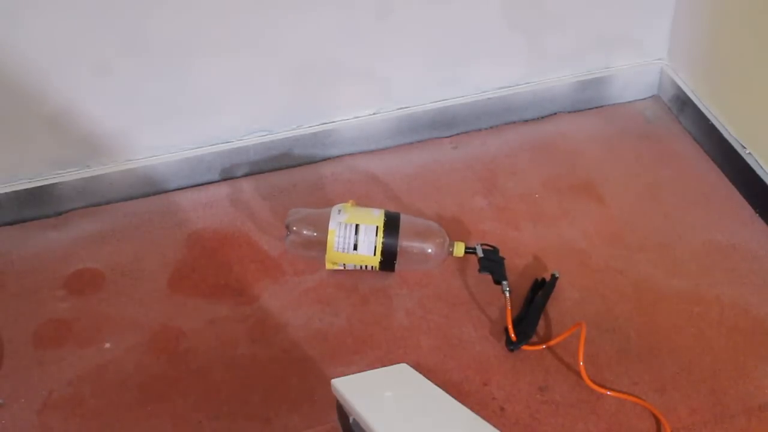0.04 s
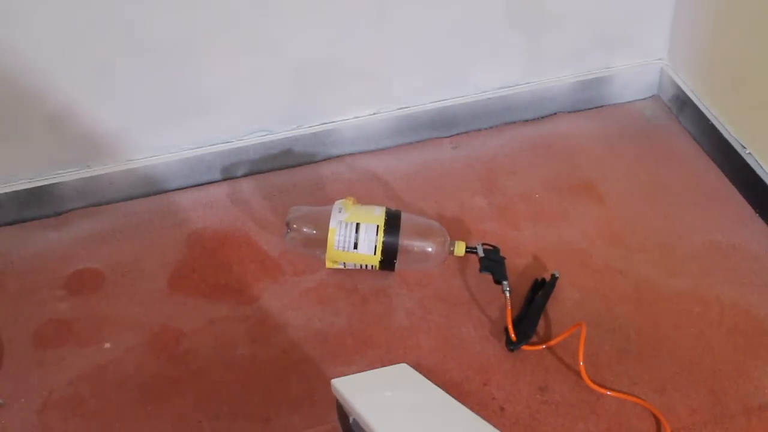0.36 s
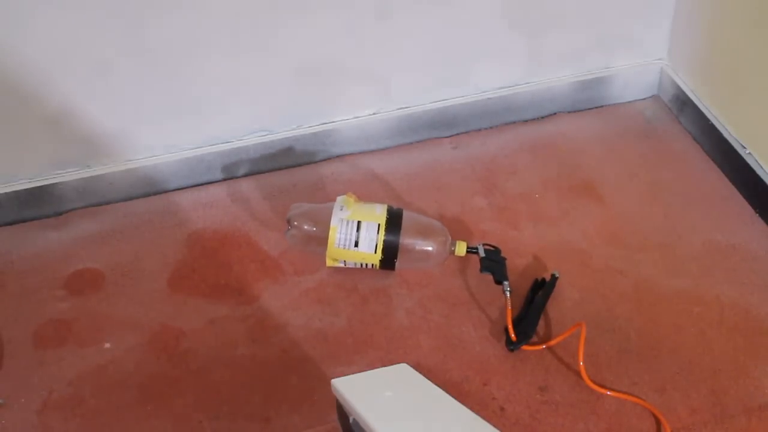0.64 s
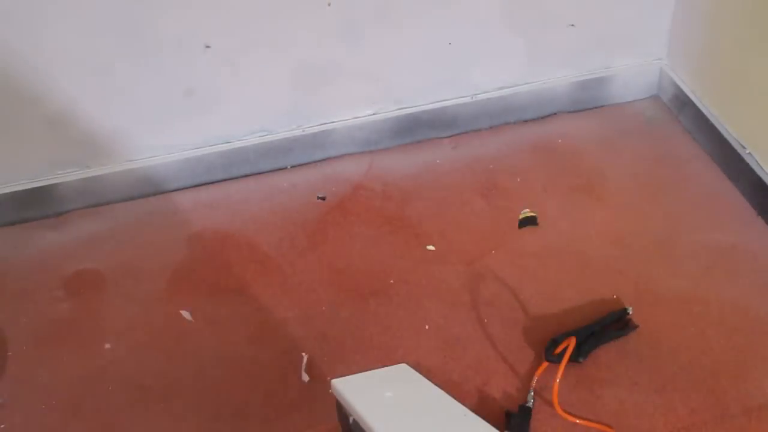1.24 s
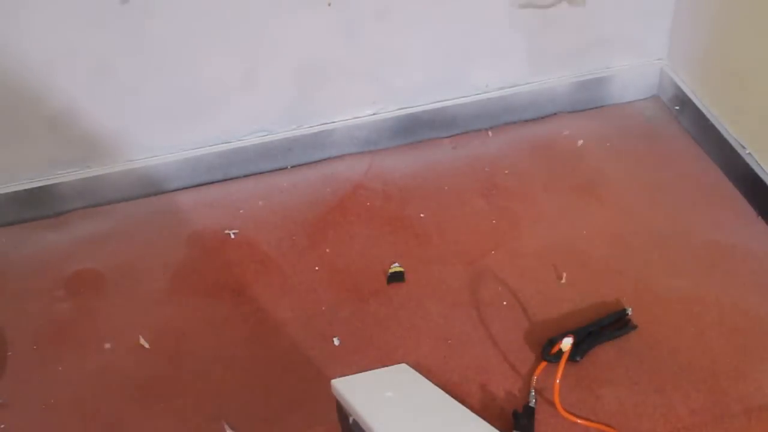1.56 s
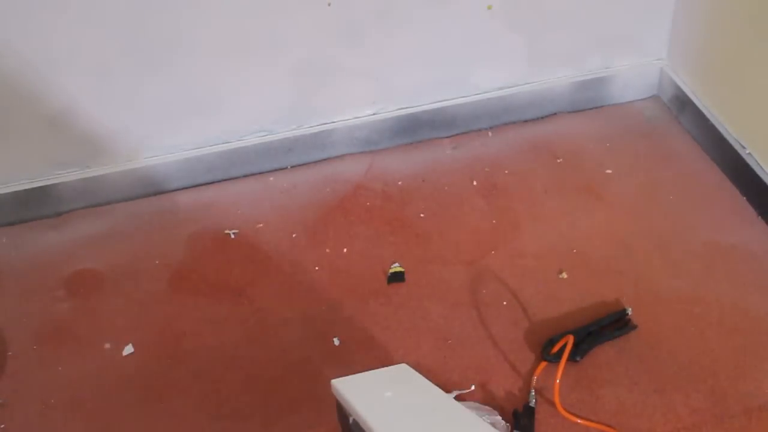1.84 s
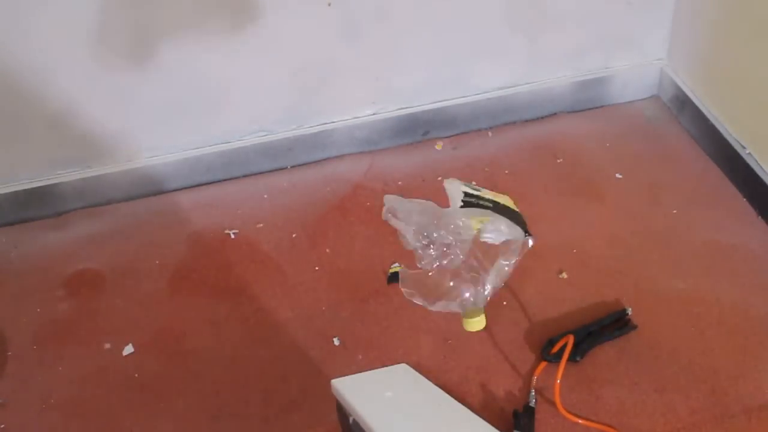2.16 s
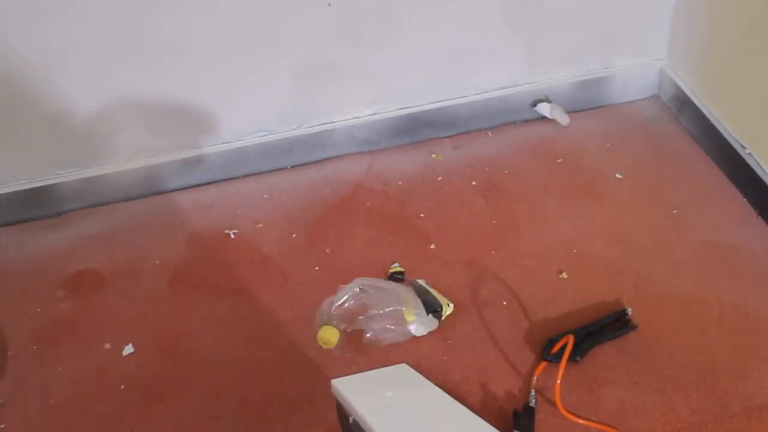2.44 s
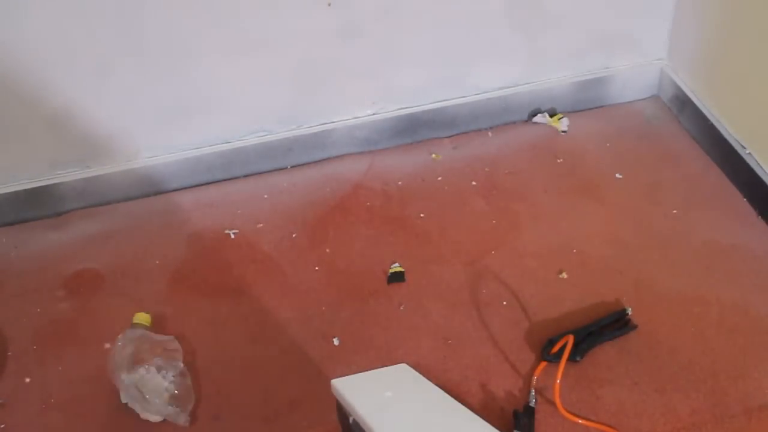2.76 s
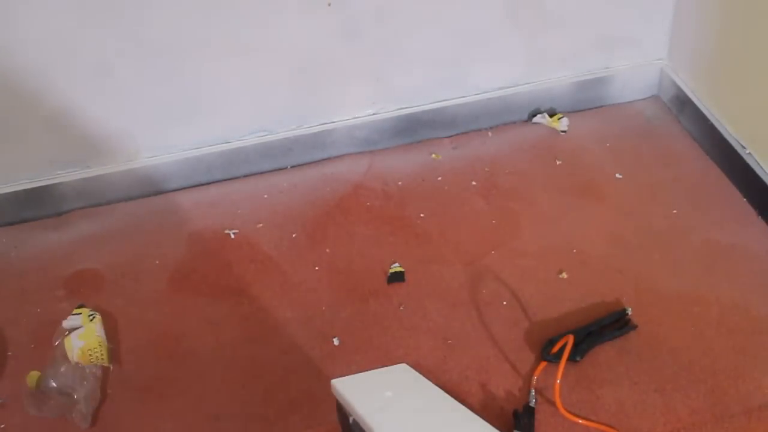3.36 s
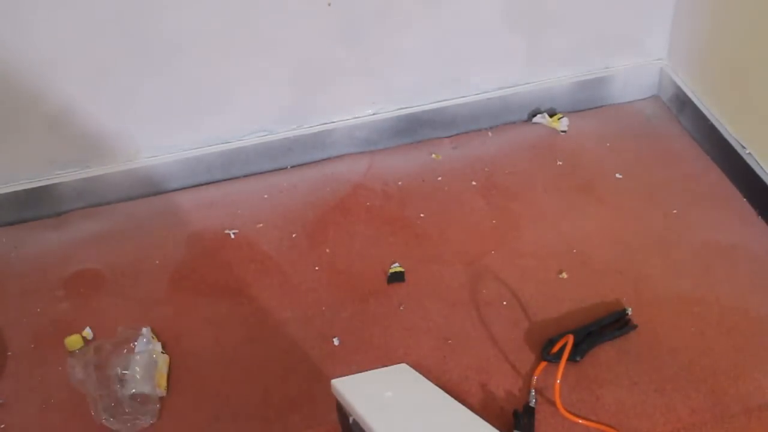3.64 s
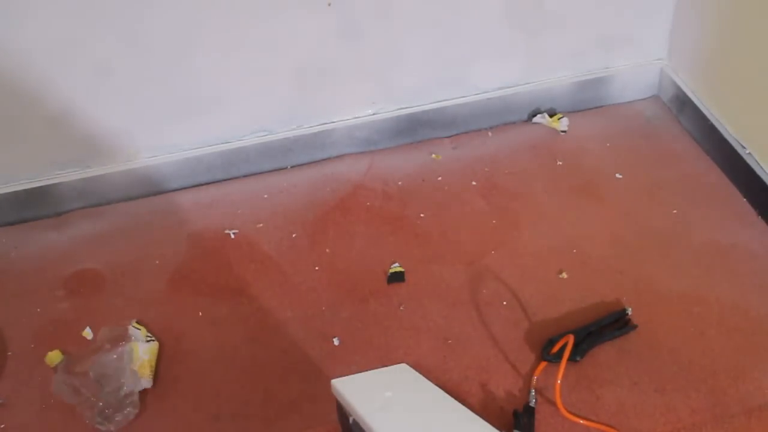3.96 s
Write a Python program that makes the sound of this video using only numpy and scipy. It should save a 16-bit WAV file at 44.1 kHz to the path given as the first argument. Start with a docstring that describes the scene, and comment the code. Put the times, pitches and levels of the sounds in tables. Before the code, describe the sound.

Compressed air hisses into a plastic bottle, which explodes with a sharp, distorted bang that echoes briefly off hard walls. A steady hiss from the hose follows, with one short rattling rush as the bottle tumbles through the jet.

```python
"""In a hard, bare room, compressed air hisses and whistles into a plastic bottle on the floor.
At 0.7 s the bottle bursts. The bang overloads the microphone, and the gain control (an automatic
volume knob) turns everything down. As the volume comes back, the room rings out with sound bouncing
between its walls, and the open hose hisses on. About a second after the bang, the torn bottle
tumbles through the jet of air, which rattles it. Then only the hiss is left."""
import sys
import numpy as np
from scipy import signal
from scipy.fft import rfft, irfft
from scipy.io import wavfile

SR = 44100
rng = np.random.default_rng(int(sys.argv[2]) if len(sys.argv) > 2 else 0)


def file_out(sig):
    """Save sig as 16-bit WAV at sys.argv[1]."""
    # one column per channel
    cols = np.atleast_2d(sig).T
    # limit, then scale
    lim = np.clip(cols, -1, 1)
    pcm = np.round(lim * 32767).astype(np.int16)
    wavfile.write(sys.argv[1], SR, pcm)


N = 176400  # 4 seconds
T = np.arange(N) / SR
HZ = np.maximum(np.arange(N // 2 + 1) * SR / N, 1)
BURST_S = 0.7036

# Hiss of air squeezing into the bottle: (frequency [Hz], relative level [dB])
FILL_HISS = [(40, -27), (150, -24.5), (380, -24), (560, -16.5), (1400, -12.5), (2200, -6.5), (3400, -0.5),
             (5000, -3.5), (7200, -5), (10000, -1), (14000, -0.5), (15800, 1.5)]
# Whistles of the nozzle and bottle: (pitch [Hz], width [Hz], relative level [dB])
FILL_WHISTLES = [(540, 30, -17), (835, 30, -15), (1110, 30, -14), (1640, 35, -3), (2080, 35, -4),
                 (2550, 60, 0), (2870, 50, -6), (3260, 90, -4), (3780, 60, -7), (6070, 90, -9),
                 (8620, 230, -.5), (11750, 160, -3), (13470, 150, 4), (14030, 50, -1), (15130, 90, -3)]
# The bang scattered by the room. A fade time is how long a sound takes to drop by 60 dB.
# (frequency [Hz], level before rise and fade [dB per octave], fade time [s], rise time [s])
BLAST_BANDS = [(35, -24, 0.25, 0.088), (77, 17.5, .36, 0.052), (124, 3, 0.28, 0.032),
               (293, 18, 0.37, 0.056), (556, 23, 0.37, 0.043), (1420, 25.5, 0.3, 0.021),
               (2700, 23.5, 0.33, 0.0032), (5130, 25, 0.27, 0.0017), (11800, 22.5, 0.2, 0.00037)]
# The room's own weaker notes: (pitch [Hz], relative level [dB], fade time [s])
ROOM_NOTES = [(79, -2, .46), (280, -1, .63), (355, -1, .6), (447, 4, .62), (533, 2, .58), (549, 4, .56),
              (624, -1, .58), (975, -2, .6)]
# Notes of the echo between facing walls: (multiple of the echo rate, relative level [dB], fade time [s])
FLUTTER_NOTES = [(5, -3.5, .64), (6, -5, .6), (7, -3.5, .86), (8, -9, .66), (9, -5, .72), (10, -5.5, .72)]
# Hiss of the open hose: (frequency [Hz], relative level [dB])
JET_HISS = [(40, -22), (100, -16), (200, -14), (370, -13.7), (800, -14.5), (1450, -12), (2700, -11.3),
            (3500, -9.2), (4800, -5.7), (6000, -5.8), (8500, -3.2), (10500, -1), (13000, .8)]
# How loud the open hose is: (time [s], level [dB])
JET_LOUDNESS = [(.72, -1), (1.0, -18), (1.09, -14), (1.3, -8), (1.45, -11), (1.8, -10), (1.92, -14),
                (2.1, -11), (3, -13), (4, -12.5)]
# The hiss bouncing off floor and walls: (delay [s], gain [times the direct sound])
JET_ECHOES = [(.0021, 0.053), (.0047, 0.093), (.0069, 0.073), (.0082, 0.13), (0.0122, .2), (0.0147, 0.081),
              (.0236, 0.15)]
# Faint whistles in the jet: (pitch [Hz], width [Hz], relative level [dB])
HOSE_WHISTLES = [(4870, 70, -3.5), (5030, 70, -3), (5600, 70, -5), (6855, 35, 1), (7830, 40, -1),
                 (8230, 70, -2), (9540, 30, 4), (9680, 35, 2), (10150, 35, 4), (11650, 50, 2),
                 (13220, 50, 2), (13800, 35, 3), (14205, 40, 5)]
# The torn bottle passing through the jet: (time [s], level [dB], ringing pitch [Hz])
BOTTLE_TUMBLE = [(1.72, -29, 5070), (1.78, -17, 4940), (1.84, -16.5, 4863), (1.9, -18, 2643),
                 (1.935, -18, 1893), (1.97, -21.5, 1700), (2.06, -37, 1740)]
# Air rushing over the torn bottle: (frequency [Hz], relative level [dB])
BOTTLE_RUSH = [(60, -18), (250, -9), (600, -5), (2000, -3.5), (5000, 0.5), (9000, -1.5), (15000, -9)]


def from_db(db):
    """Turn decibels into a number to multiply by."""
    return 10 ** (np.asarray(db) / 20)


def unit_level(x):
    """Scale a sound so its average strength (rms) is 1."""
    return x / np.sqrt(np.mean(x ** 2) + 1e-20)


def over_time(rows):
    """Join a table's points with lines, giving a value for every sample."""
    times, *columns = np.transpose(rows)
    return [np.interp(T, times, column) for column in columns]


def at_hz(rows, hz, column=1):
    """Read between a table's rows, with octaves evenly spaced."""
    rows = np.array(rows)
    return np.interp(np.log(hz), np.log(rows[:, 0]), rows[:, column])


def noise(gains):
    """Noise of strength 1, shaped by a gain for each frequency."""
    return unit_level(irfft(rfft(rng.standard_normal(N)) * gains, N))


def drift(rate_hz):
    """A random wobble of strength 1, mostly slower than rate_hz."""
    return noise(1 / (1 + (HZ / rate_hz) ** 2))


def swell_and_fade(start_s, rise_s, fade_s):
    """A loudness shape that grows, then dies away."""
    age = np.maximum(T - start_s, 0)
    return (1 - np.exp(-age / rise_s)) * np.exp(-np.minimum(np.log(1000) * age / fade_s, 50))


def cut_bass(x, hz):
    """Weaken everything below hz."""
    return signal.sosfilt(signal.butter(2, hz, "high", fs=SR, output="sos"), x)


def whistles(rows):
    """Rushing air sings in narrow bands of pitch."""
    power = sum(from_db(db) ** 2 / (1 + 2 * ((HZ - hz) / width) ** 2) ** 2 for hz, width, db in rows)
    return noise(np.sqrt(power))


def filling():
    """Air hisses and whistles through the nozzle until the bottle gives way."""
    hiss = from_db(-17) * noise(from_db(at_hz(FILL_HISS, HZ)))
    whistling = from_db(-19.5) * whistles(FILL_WHISTLES)
    flicker = from_db(0.2 * drift(120))
    return (hiss + whistling) * flicker * (T < BURST_S)


def shock(pitch_hz=1396):
    """The bottle bursts with a few violent swings of air pressure."""
    swings = -np.sin(2 * np.pi * pitch_hz * (T - BURST_S))
    return from_db(37.5) * swings * swell_and_fade(BURST_S, rise_s=0.00023, fade_s=0.011)


def scattered_blast(delay_s=0.00043):
    """The room scatters the bang: the treble dies fastest and the bass builds up late."""
    blast = np.zeros(N)
    for hz in 30 * 2 ** (np.arange(19) / 2):
        band = noise(1 / np.sqrt(1 + (4 * np.log2(HZ / hz)) ** 8))
        db, fade_s, rise_s = (at_hz(BLAST_BANDS, hz, column) for column in (1, 2, 3))
        gain = np.sqrt(0.5) * from_db(db)  # each band is half an octave wide
        blast += gain * band * swell_and_fade(BURST_S + delay_s, rise_s, fade_s)
    return blast


def standing_wave(hz, fade_s):
    """Sound trapped between walls rings on as a wavering note; higher notes are less pure."""
    blur = 0.27 * hz / 1000 * drift(13)
    tone = np.sin(2 * np.pi * (hz * T + rng.random()) + blur)
    waver = from_db(2.5 * drift(10))
    return waver * tone * swell_and_fade(BURST_S, rise_s=0.06, fade_s=fade_s)


def room_ring(boom_rise_s=0.15):
    """The room's strongest note swells slowly into a boom, with weaker notes around it."""
    swell = 1 - np.exp(-np.maximum(T - BURST_S, 0) / boom_rise_s)
    boom = from_db(23.5) * standing_wave(hz=180.2, fade_s=0.47) * swell
    notes = sum(from_db(db) * standing_wave(hz, fade_s) for hz, db, fade_s in ROOM_NOTES)
    return boom + from_db(-1.5) * notes


def flutter_echo(echo_hz=177.6, beat_hz=6.77):
    """Sound bounces between facing walls so fast that it makes notes, which throb together."""
    notes = sum(from_db(db) * standing_wave(k * echo_hz, fade_s) for k, db, fade_s in FLUTTER_NOTES)
    throb = 2 * np.abs(np.cos(np.pi * beat_hz * (T - BURST_S)))
    return notes * throb


def hose_jet():
    """Swirling air from the open hose hisses, whistles faintly and bounces off floor and walls."""
    level_db, = over_time(JET_LOUDNESS)
    hiss = noise(from_db(at_hz(JET_HISS, HZ)))
    hiss *= from_db(0.32 * drift(120) + 0.27 * drift(45))  # slight flicker
    echoes = sum(gain * np.roll(hiss, int(delay_s * SR)) for delay_s, gain in JET_ECHOES)
    jet = unit_level(hiss + echoes) + from_db(-13) * whistles(HOSE_WHISTLES)
    return from_db(level_db) * unit_level(jet) * (T > BURST_S)


def tumbling_bottle(ring_width_hz=560, rattle_db=1):
    """The jet rattles the torn bottle, whose pitch falls as it turns its opening to the air."""
    level_db, pitch_hz = over_time(BOTTLE_TUMBLE)
    ring = np.sqrt(2) * drift(ring_width_hz) * np.cos(2 * np.pi * np.cumsum(pitch_hz) / SR)
    rush = noise(from_db(at_hz(BOTTLE_RUSH, HZ)))
    bottle = unit_level(cut_bass(rush + from_db(-9) * ring, hz=250))
    in_jet = (T > BOTTLE_TUMBLE[0][0]) & (T < BOTTLE_TUMBLE[-1][0])
    return bottle * from_db(level_db + rattle_db * drift(90)) * in_jet


def scene():
    """Add up all the sounds, the same for left and right."""
    mix = filling() + shock() + scattered_blast() + room_ring() + flutter_echo()
    mix += hose_jet() + tumbling_bottle()
    return np.tile(mix, (2, 1))


def gain_control(x, limit_db=-12, squeeze=0.91, listen_s=0.0048, lag_s=0.003):
    """A volume knob that turns down a moment after the sound gets too loud, then comes back up."""
    memory = np.exp(-1 / (listen_s * SR))
    power = signal.lfilter([1 - memory], [1, -memory], x ** 2)
    excess_db = np.maximum(10 * np.log10(power + 1e-12) - limit_db, 0)
    release_db = 346 * T  # the held excess shrinks by 346 dB a second
    held_db = np.maximum.accumulate(excess_db + release_db) - release_db
    return from_db(-squeeze * np.interp(T - lag_s, T, held_db))


def record(dry):
    """The microphone overloads, the volume dips, the first swings clip and the highest treble is cut."""
    mic_ceiling = from_db(25)
    mic = cut_bass(mic_ceiling * np.tanh(dry / mic_ceiling), hz=75)
    clipped = np.clip(mic * gain_control(mic[0]), -0.95, 0.95)
    treble_cut = signal.ellip(12, 0.1, 70, 15850, fs=SR, output="sos")  # steep, above 15850 Hz
    return signal.sosfilt(treble_cut, clipped)


dry = scene()
out = record(dry)
file_out(out)
```